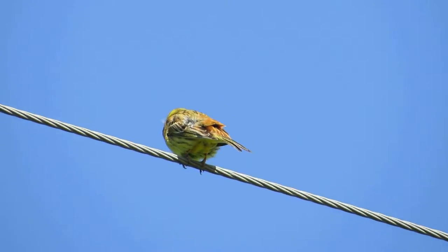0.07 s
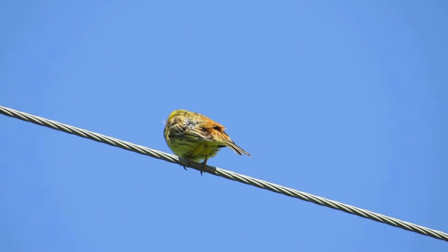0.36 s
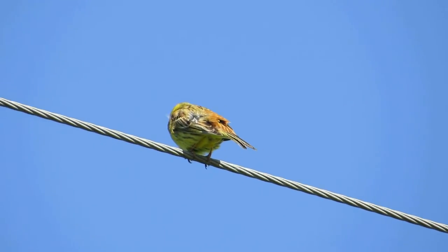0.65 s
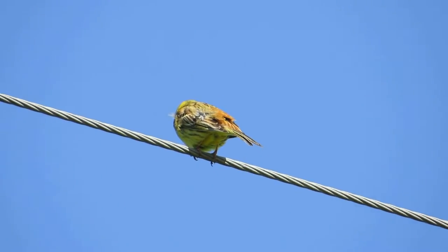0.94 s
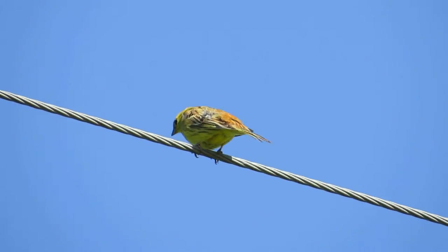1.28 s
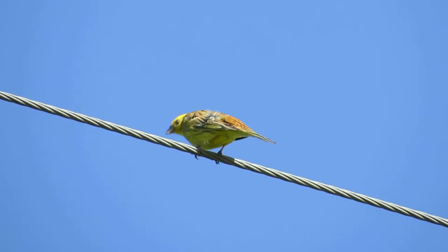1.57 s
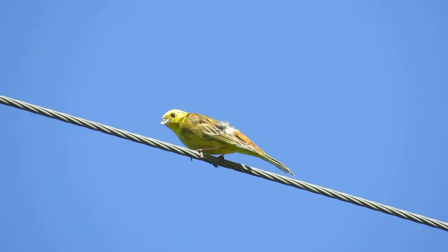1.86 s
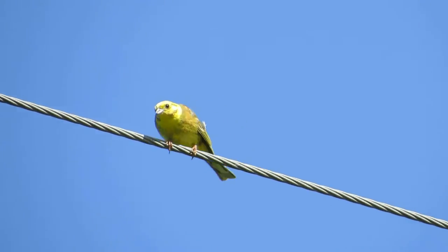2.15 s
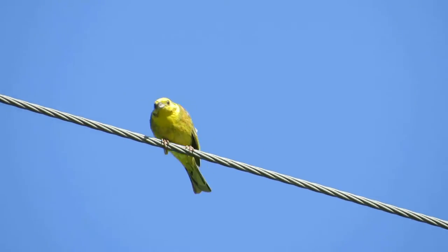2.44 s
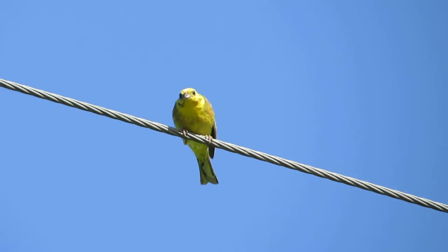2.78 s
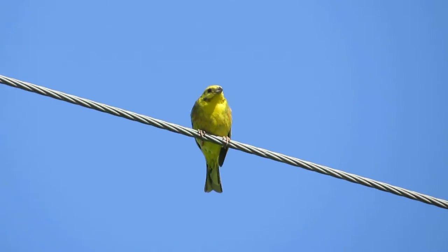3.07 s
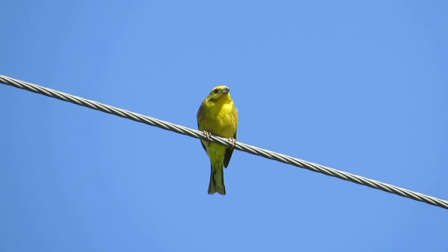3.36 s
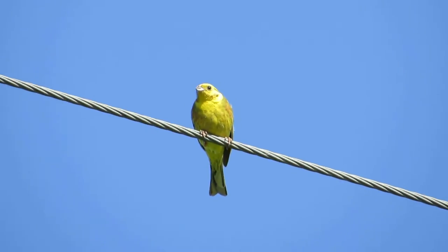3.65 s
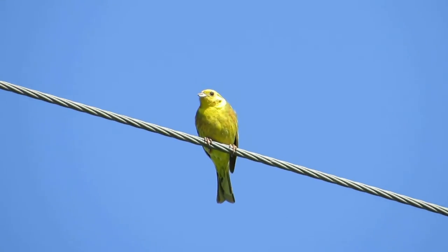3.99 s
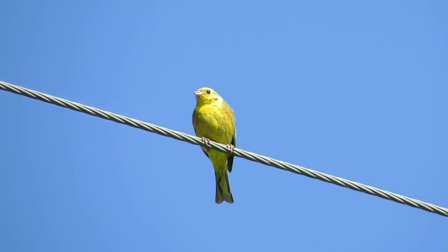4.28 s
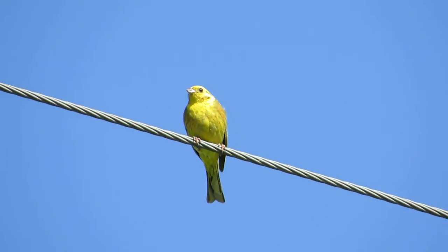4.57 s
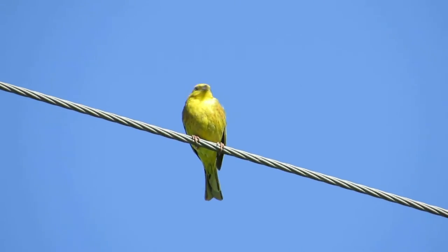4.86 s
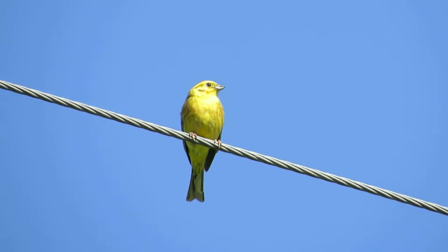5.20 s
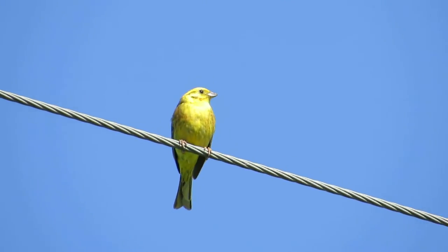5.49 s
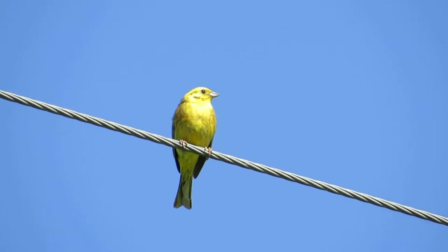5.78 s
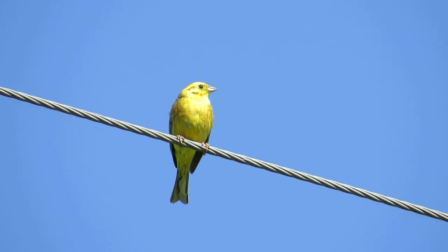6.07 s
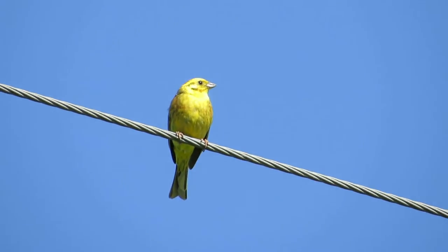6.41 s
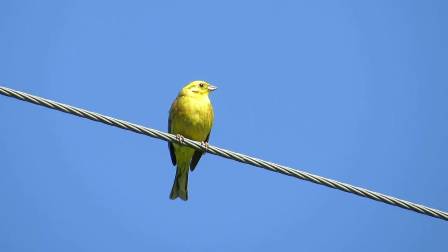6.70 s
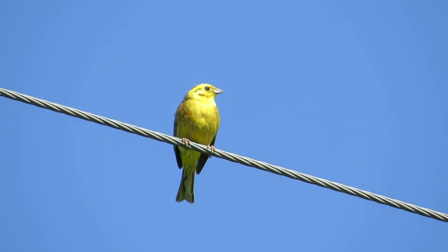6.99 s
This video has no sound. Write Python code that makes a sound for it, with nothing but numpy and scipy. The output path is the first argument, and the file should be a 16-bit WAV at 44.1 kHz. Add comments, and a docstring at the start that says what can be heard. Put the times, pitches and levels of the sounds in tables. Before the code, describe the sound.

Gusty wind rumbles and thumps on the microphone, while faint birds whistle and chirp in distant trees over a soft traffic hum.

```python
"""Wind buffets a microphone, pushing its two channels in opposite directions.
Swirls of air (eddies) rumble and knock the housing; the hardest gusts overload it with a crackle.
Behind the wind, birds whistle in distant trees over the hum of far traffic and a soft hiss.
At each overload the birds and background sink abruptly, and after most they creep back up."""
import sys
import numpy as np
from scipy import signal
from scipy.fft import rfft, irfft, next_fast_len
from scipy.io import wavfile
from scipy.ndimage import uniform_filter1d, map_coordinates

SR = 44100
rng = np.random.default_rng(int(sys.argv[2]) if len(sys.argv) > 2 else 0)


def store_pcm(level_fs):
    """Save levels as 16-bit WAV."""
    pcm = np.round(np.clip(level_fs, -1, 1) * 32767).astype(np.int16)
    wavfile.write(sys.argv[1], SR, np.atleast_2d(pcm).T)


N = 314874
TIME = np.arange(N) / SR

# Levels in the tables are relative: the functions turn them up or down.
# the breeze on the microphone: (time [s], strength [dB])
BREEZE = [(0.0, -37), (0.46, -18), (0.79, -29.5), (1.44, -19.5), (1.49, -32.5), (1.71, -20), (2.31, -20),
          (2.89, -19.5), (3.04, -25), (3.49, -17.5), (3.81, -33), (3.97, -22), (4.36, -29), (5.09, -24),
          (5.57, -33), (6.11, -22.5), (6.6, -24), (7.14, -19.5)]
# gusts on top of it: (peak time [s], half length [s], strength [dB], pitch of smallest eddies [Hz])
GUSTS = [(0.082, 0.079, -15.5, 301), (0.239, 0.08, -14.5, 159), (0.562, 0.014, -20, 152),
         (0.821, 0.072, -14.5, 102), (1.253, 0.042, -10, 110), (1.343, 0.015, -7.5, 310),
         (1.388, 0.046, -13, 150), (1.582, 0.028, -15, 225), (1.788, 0.054, -12.5, 225),
         (1.905, 0.033, -20.0, 350), (2.02, 0.081, -18, 235), (2.125, 0.017, -13.5, 311),
         (2.238, 0.065, -16.5, 303), (2.44, 0.062, -19, 218), (2.624, 0.051, -18, 174),
         (2.88, 0.086, -18.5, 170), (3.274, 0.0093, -13, 234), (3.388, 0.024, -14.5, 278),
         (3.463, 0.017, -14.5, 171), (3.646, 0.022, -17, 236), (3.76, 0.047, -20.5, 227),
         (3.927, 0.025, -10.5, 298), (4.252, 0.028, -22.5, 93), (4.489, 0.017, -15, 115),
         (4.684, 0.058, -27, 167), (4.856, 0.046, -19, 124), (5.022, 0.037, -18, 150),
         (5.13, 0.033, -20.5, 182), (6.035, 0.023, -18, 176), (6.153, 0.043, -18.5, 184),
         (6.259, 0.017, -16, 144), (6.978, 0.041, -14.5, 129.6)]
# the tone of the wind, before its highs are rolled off: (frequency [Hz], level per hertz [dB])
WIND_SPECTRUM = [(18, -23.5), (35, 3.5), (52, -1.5), (72, 4.5), (100, 1), (150, 3), (220, 1), (320, 0.5),
                 (600, -5.5)]
# the side that the wind favours: (time [s], left minus right [dB])
WIND_SIDE = [(0, 2), (1.1, 2.8), (1.5, -1.48), (3.0, -3), (4.2, -1.68), (4.8, -3)]
# single hard shoves of air: (time [s], level [dB], pitch [Hz])
BUFFETS = [(0.058, -2.5, 165), (.085, -2.5, 232), (.105, -3, 250), (.157, -10, 206), (1.339, -4.5, 128),
           (1.346, -1, 266), (1.764, 1.5, 126), (1.783, 2, 404), (1.806, -1, 274), (1.87, -19, 300),
           (1.897, -16, 285), (2.003, -10, 193), (2.037, -13, 314), (2.069, -8.5, 352), (2.132, -2.5, 250),
           (2.235, -1.5, 313), (2.296, -6.5, 287), (2.363, -6, 236), (2.843, -5, 140), (2.884, -2.5, 168),
           (3.278, -1, 167), (3.382, -6.5, 242), (3.604, -1.5, 198), (3.891, -8, 244), (3.933, -0.5, 273),
           (4.991, -5.5, 125), (5.154, -3.5, 169), (6.159, -4.5, 146)]
# microphone overloads: (time [s], crackle level [dB], background just after [dB], recovery [dB/s])
OVERLOADS = [(0.104, -41, -6, 8), (1.344, -31, -8.5, 14), (1.783, -29.5, -14, 6.5),
             (2.237, -44, -13.5, 16.5), (2.88, -63, -6.5, 6), (3.275, -34.5, -9, -1.5),
             (3.935, -35, -10.3, 4)]
# a fluting song: (time [s], length [s], start pitch [Hz], middle pitch [Hz], end pitch [Hz],
# level [dB], warble depth [Hz])
SONG = [(.155, 0.12, 1980, 1990, 2060, -46, 96), (.268, 0.074, 2980, 2560, 2030, -41.5, 40),
        (.42, .14, 1800, 1666, 1527, -46.5, 6), (.58, 0.1, 2320, 2190, 1755, -41, 105),
        (.895, .091, 2740, 2910, 3190, -55, 77), (.955, 0.08, 2047, 2100, 1770, -42.5, 23),
        (1.083, 0.036, 2286, 2660, 3060, -39.5, 94), (1.115, 0.065, 2780, 2560, 1640, -42, 271),
        (1.172, 0.13, 1650, 1592, 1714, -50, 85)]
# slurred calls of other birds, with the same columns as SONG
FAR_CALLS = [(1.715, 0.089, 2954, 3090, 3020, -41.5, 123), (1.79, 0.21, 3156, 3370, 3210, -49, 242),
             (1.95, 0.1, 3020, 2810, 2800, -55, 40), (2.12, 0.093, 2950, 2770, 3020, -53, 250),
             (2.29, .071, 5320, 5210, 5300, -60, 120), (5.19, 0.12, 4760, 4540, 4350, -61, 110),
             (5.53, 0.27, 1940, 2050, 2134, -58.5, 180), (7.01, 0.047, 3400, 3300, 3220, -62, 150)]
# a thin, high trill of separate pips: (time [s], level [dB])
TRILL = [(1.385, -57), (1.414, -52), (1.453, -55), (1.49, -53), (1.547, -52), (1.587, -48.5),
         (1.635, -52.5)]
# tiny chirps, each one quick slide: (time [s], start pitch [Hz], end pitch [Hz], level [dB])
CHIRPS = [(1.857, 5800, 7900, -53), (1.929, 4970, 4220, -49), (5.393, 6200, 7600, -50.5),
          (6.203, 6000, 8200, -55)]
# the tone of far traffic: (frequency [Hz], level per hertz [dB])
TRAFFIC_SPECTRUM = [(100, 3), (300, 1), (520, -1), (750, 0), (950, -1.5), (1150, -3), (1500, -10),
                    (2500, -18), (4000, -30)]
# the tone of the soft hiss: (frequency [Hz], level per hertz [dB])
HISS_SPECTRUM = [(1000, 9), (3000, 7.5), (5000, 3.5), (7500, 2), (8500, -1), (11000, -4.5), (13500, -13),
                 (15000, -53)]


def wind(level_db, steepness, steadiness, sputter_db):
    """Eddies as bands of noise: faster air sheds smaller, higher ones, and the smallest come in bursts."""
    step = 40   # samples between points of the slow curves
    breeze_db, slow_time = curves(BREEZE)[0][::step], TIME[::step]
    # the smallest eddies set the top pitch, which doubles when the breeze is 12 dB stronger
    top_hz = 101.2 * 2 ** ((breeze_db - breeze_db.mean()) / 12)
    peak_s, half_length_s, gust_db, gust_top_hz = np.transpose(GUSTS)
    gust_shapes = np.exp(-((slow_time[:, None] - peak_s) / half_length_s) ** 2)
    gust_power = (from_db(gust_db) * gust_shapes) ** 2
    wander = 2 ** (.15 * (drift(rate_hz=30)[::step] - .5))   # eddy size changes by chance
    bursts = from_db(sputter_db * drift(rate_hz=180))
    bursts /= np.sqrt(uniform_filter1d(bursts ** 2, SR // 25))
    edges_hz = 18 * 2 ** np.arange(0, 6.5, .5)   # half an octave apart
    out = np.zeros(N)
    for low, high in zip(edges_hz, edges_hz[1:]):
        hz = np.sqrt(low * high)
        noise = band(rng.standard_normal(N + SR), low / 1.1, high * 1.1)
        eddies = unit_power(band(noise, low, high)[SR:])
        swell = uniform_filter1d(eddies ** 2, int(SR * max(.03, 3 / hz))) + 1e-6
        eddies = unit_power(eddies / swell ** (steadiness / 2))   # partly even out chance swells
        fineness = (hz / wander) ** steepness   # weakens bands above the top pitch
        power = from_db(breeze_db) ** 2 / (1 + fineness / top_hz ** steepness)
        power += np.sum(gust_power / (1 + fineness[:, None] / gust_top_hz ** steepness), axis=1)
        strength = np.interp(TIME, slow_time, np.sqrt(power))
        gain = np.sqrt((high - low) / 125) * from_db(level_at(WIND_SPECTRUM, hz) + level_db)
        burst_share = hz ** 2 / (hz ** 2 + 300 ** 2)
        out += eddies * gain * strength * (1 - burst_share + burst_share * bursts)
    return out


def buffeted(flow, cycles, clear_s):
    """A big eddy sweeps the small ones aside and swings the pressure on the microphone once or twice."""
    swings, flow_left = np.zeros(N), np.ones(N)
    for s, level_db, hz in BUFFETS:
        now = around(s)
        age = TIME[now] - s
        swings[now] += from_db(level_db) * np.sin(2 * np.pi * hz * age) / np.cosh(age * hz / cycles)
        flow_left[now] *= 1 - np.exp(-(age / clear_s) ** 2)
    return flow * flow_left + swings


def knocks(level_db, pitch_ratio):
    """Each buffet knocks the housing with one push and one pull, alike on both sides."""
    out = np.zeros(N)
    for s, buffet_db, hz in BUFFETS:
        now = around(s)
        phase = np.clip((TIME[now] - s) * 2 * np.pi * hz * pitch_ratio, -10, 10)
        abrupt_db = 6 * np.log2(hz / 302)   # a quicker buffet knocks harder
        out[now] += from_db(buffet_db + abrupt_db + level_db) * phase * np.exp((1 - phase ** 2) / 2)
    return out


def crackles(width_s, top_hz, level_db):
    """Each overload makes a burst of noise a millisecond or two long."""
    spikes = sum(from_db(peak_db + level_db) * np.exp(-np.minimum(np.abs(TIME - s) / width_s, 30))
                 for s, peak_db, _, _ in OVERLOADS)
    low_pass = signal.butter(1, top_hz, fs=SR, output="sos")
    return signal.sosfilt(low_pass, spikes * stereo_noise(alike=-0.32))


def sinking(start_db, drop_s):
    """The level of birds and background in dB: it drops at each overload, then mostly climbs back."""
    level_db = np.full(N, start_db, float)
    for s, _, low_db, db_per_s in OVERLOADS:
        dropped = np.clip((TIME - s) / drop_s, 0, 1)
        level_db += dropped * (low_db + db_per_s * (TIME - s) - level_db)
    return level_db


def birds():
    """A fluting singer deep in the trees, a nearer trill and scattered calls, all to the left."""
    song = whistles(SONG, warble_rate_hz=110, waver_db=4.0, fade_power=0.44)
    pips = trill_notes(first_hz=4630, sag_hz_per_s=800, length_s=.021, fall_hz=140)
    trill = whistles(pips, warble_rate_hz=0, waver_db=2.5, fade_power=0.55)
    chirps = [slide(s, 0.011, start_hz, end_hz, db) for s, start_hz, end_hz, db in CHIRPS]
    calls = whistles(list(FAR_CALLS) + chirps, warble_rate_hz=140, waver_db=5.5, fade_power=0.44)
    return (placed(song, pan_db=6.5, lag_s=.00003, direct_db=-5.5, echo_db=-5.0, echo_pan_db=5.5)
            + placed(trill, pan_db=4.0, lag_s=.00001, direct_db=-5.0, echo_db=-3.5, echo_pan_db=-1.0)
            + placed(calls, pan_db=4.5, lag_s=.00002, direct_db=-10.0, echo_db=-8.0, echo_pan_db=2.0))


def whistles(notes, warble_rate_hz, waver_db, fade_power):
    """Each bird note is a pure tone gliding through three pitches, some with a fast warble."""
    out = np.zeros(N)
    for s, length_s, start_hz, middle_hz, end_hz, level_db, warble_hz in notes:
        progress = np.linspace(0, 1, int(length_s * SR))
        waver, jitter = [np.interp(progress, np.linspace(0, 1, 9), points)
                         for points in rng.standard_normal((2, 9))]
        hz = np.polyval(np.polyfit([0, .5, 1], [start_hz, middle_hz, end_hz], 2), progress)
        hz += warble_hz * np.sin(2 * np.pi * warble_rate_hz * length_s * progress + jitter)
        swell = np.abs(np.sin(np.pi * progress)) ** fade_power * from_db(level_db + waver_db * waver)
        at = int(s * SR)
        out[at:at + len(hz)] += np.sqrt(2) * swell * np.sin(2 * np.pi * np.cumsum(hz) / SR)
    return out


def trill_notes(first_hz, sag_hz_per_s, length_s, fall_hz):
    """Each pip of the trill falls a little and lies lower than the one before."""
    starts, levels_db = np.transpose(TRILL)
    pitches = first_hz - sag_hz_per_s * (starts - starts[0])
    return [slide(s, length_s, hz + fall_hz / 2, hz - fall_hz / 2, db)
            for s, hz, db in zip(starts, pitches, levels_db)]


def slide(s, length_s, start_hz, end_hz, level_db):
    """A note that glides straight, without warble."""
    return s, length_s, start_hz, (start_hz + end_hz) / 2, end_hz, level_db, 0


def placed(call, pan_db, lag_s, direct_db, echo_db, echo_pan_db):
    """A bird to the left is louder and earlier there; its echo is spread wider."""
    delayed = np.interp(TIME - lag_s, TIME, call)
    direct = np.array([call * from_db(pan_db / 2), delayed * from_db(-pan_db / 2)])
    echo = tree_echo(call) * from_db([[echo_pan_db / 2], [-echo_pan_db / 2]])
    return from_db(direct_db) * direct + from_db(echo_db) * echo


def tree_echo(call, early_s=0.045, early_db=3.0, tail_s=0.8, build_s=0.022):
    """Trunks and leaves scatter a dense early echo and a long thin tail, different on each side."""
    age = np.arange(SR) / SR
    fade = from_db(-60 * age / tail_s) + from_db(early_db) * np.exp(-age / early_s)
    echoes = rng.standard_normal((2, SR)) * fade * (1 - np.exp(-age / build_s))
    echoes /= np.sqrt(np.sum(echoes ** 2, axis=1, keepdims=True))
    return signal.fftconvolve(call[None], echoes, axes=1)[:, :N]


def background(hum_hz=744.8, hum_width_hz=29):
    """Far traffic with one narrow hum in it, and an even hiss: all are filtered noise."""
    traffic = coloured(stereo_noise(alike=0.038), TRAFFIC_SPECTRUM)
    hum_filter = signal.iirpeak(hum_hz, hum_hz / hum_width_hz, fs=SR)
    hum = unit_power(signal.lfilter(*hum_filter, stereo_noise(alike=0.2)))
    hiss = coloured(stereo_noise(alike=0.017), HISS_SPECTRUM)
    return from_db(-47) * traffic + from_db(-53) * hum + from_db(-56.5) * hiss


def stereo_noise(alike):
    """White noise in two channels; alike runs from -1 (opposite) to 1 (the same)."""
    mid, side = rng.standard_normal((2, N))
    return np.sqrt(1 + alike) * mid + np.sqrt(1 - alike) * side * [[1], [-1]]


def coloured(noise, spectrum):
    """Give noise the tone of a spectrum table, at a power of 1."""
    size = next_fast_len(N)
    hz = np.maximum(np.fft.rfftfreq(size, 1 / SR), 1)
    return unit_power(irfft(rfft(noise, size) * from_db(level_at(spectrum, hz)), size)[:, :N])


def drift(rate_hz):
    """A random curve that wanders about zero, typically by 1."""
    points = rng.standard_normal(int(N / SR * 200))
    return map_coordinates(points, [TIME * rate_hz], order=1, mode="wrap") * np.sqrt(3 / 2)


def band(x, low_hz, high_hz):
    """Keep the sound between two frequencies."""
    return signal.sosfilt(signal.butter(2, [low_hz, high_hz], "band", fs=SR, output="sos"), x)


def curves(table):
    """Join a table's points into one curve over time for each column after the first."""
    times, *columns = np.transpose(table)
    return [np.interp(TIME, times, column) for column in columns]


def level_at(spectrum, hz):
    """Read between the points of a spectrum, with octaves evenly spaced."""
    points_hz, levels_db = np.transpose(spectrum)
    return np.interp(np.log(hz), np.log(points_hz), levels_db)


def around(s):
    """The samples within 50 ms of a moment."""
    return slice(max(int(s * SR) - SR // 20, 0), int(s * SR) + SR // 20)


def from_db(db):
    """Turn decibels into a multiplier."""
    return 10 ** (np.asarray(db) / 20)


def unit_power(x):
    """Scale a sound to an average power of 1."""
    return x / np.sqrt(np.mean(x ** 2) + 1e-20)


def scene():
    """Wind pushes one side as it pulls the other, over birds and background that sink and recover."""
    flutter = from_db(2.74 * drift(rate_hz=28))   # the air comes in short lumps
    flow = flutter * wind(level_db=-1.87, steepness=9.6, steadiness=0.51, sputter_db=9.5)
    gusts = buffeted(flow, cycles=0.41, clear_s=0.0026)
    shared_wind = flutter * wind(level_db=-18, steepness=8.2, steadiness=0.52, sputter_db=8)
    lean_db, = curves(WIND_SIDE)
    air = gusts * np.array([from_db(lean_db / 2), -from_db(-lean_db / 2)]) + shared_wind
    housing = knocks(level_db=-25.0, pitch_ratio=1.12)
    crackle = crackles(width_s=0.00076, top_hz=1500, level_db=2.0)
    distant_gain = from_db(sinking(start_db=-7, drop_s=0.011))
    return air + housing + crackle + distant_gain * (birds() + background())


def record(dry, cutoff_hz=14900):
    """Two narrow dips colour the treble, loud peaks are squashed and the very top is cut."""
    for notch_hz, width_hz in [(3950, 283), (7900, 190)]:
        dry = signal.lfilter(*signal.iirnotch(notch_hz, notch_hz / width_hz, fs=SR), dry)
    rounded = dry / (1 + dry ** 8) ** (1 / 8)
    return signal.sosfilt(signal.ellip(10, .1, 70, cutoff_hz, fs=SR, output="sos"), rounded)


dry = scene()
out = record(dry)
store_pcm(out)
```